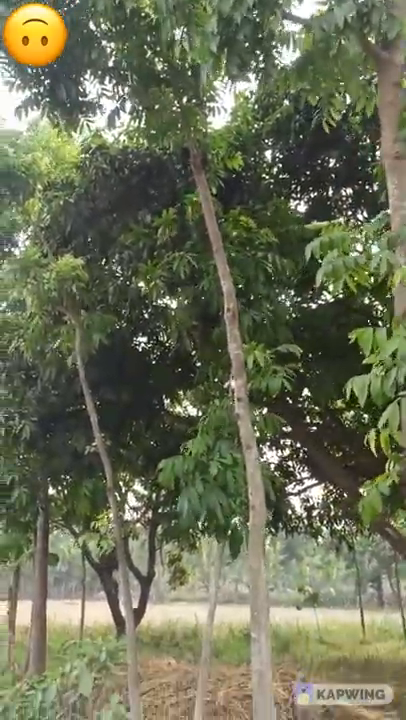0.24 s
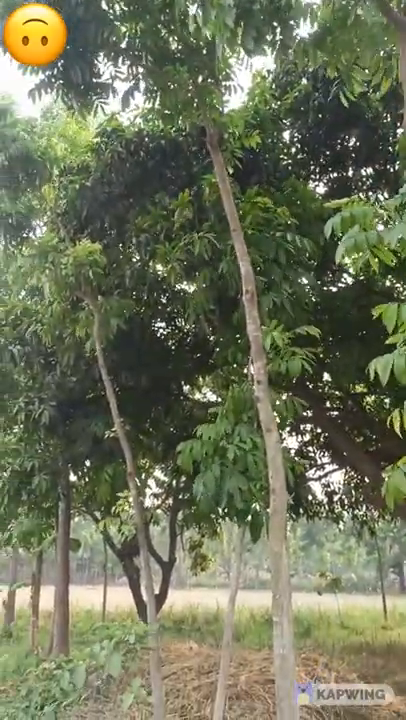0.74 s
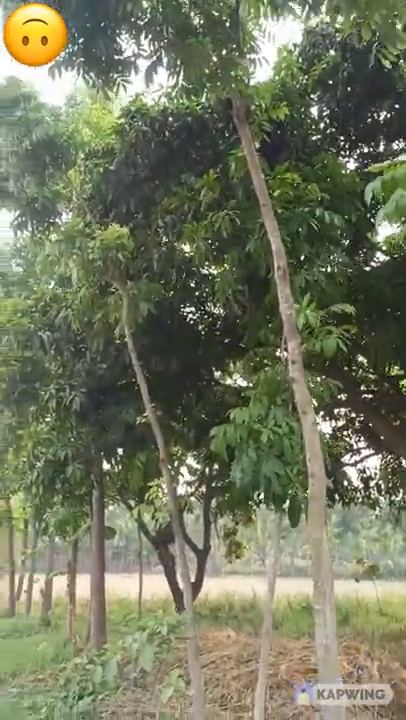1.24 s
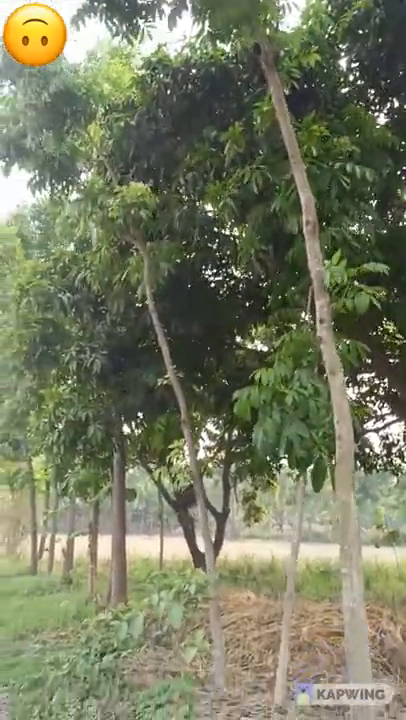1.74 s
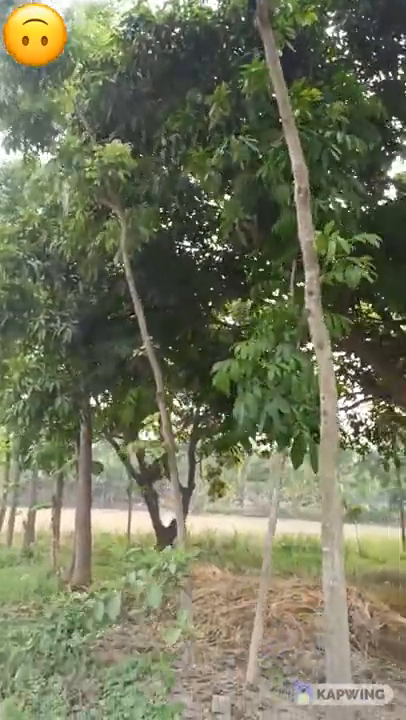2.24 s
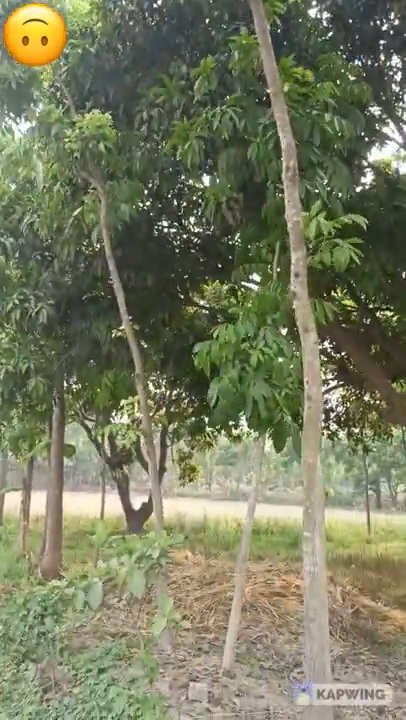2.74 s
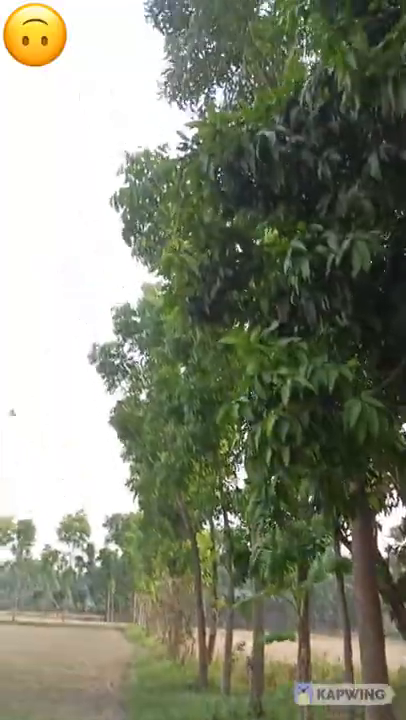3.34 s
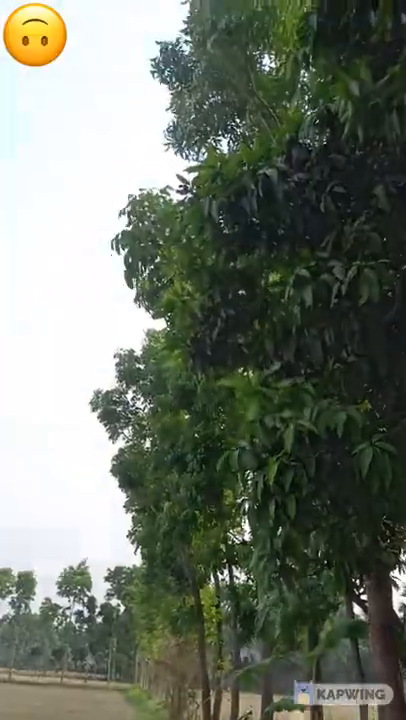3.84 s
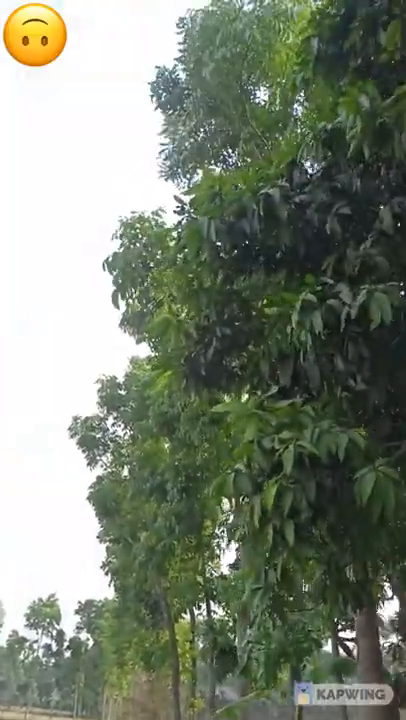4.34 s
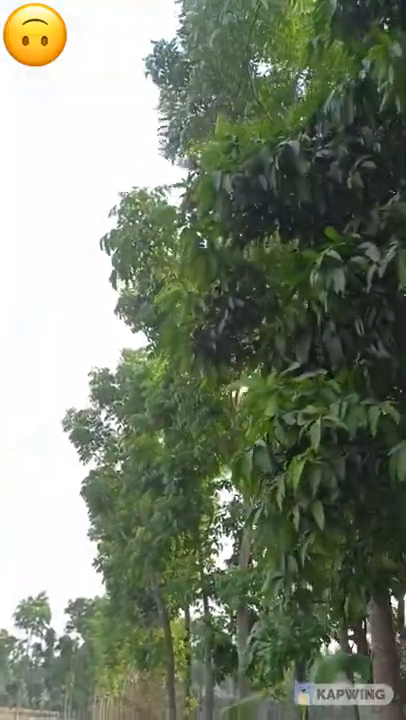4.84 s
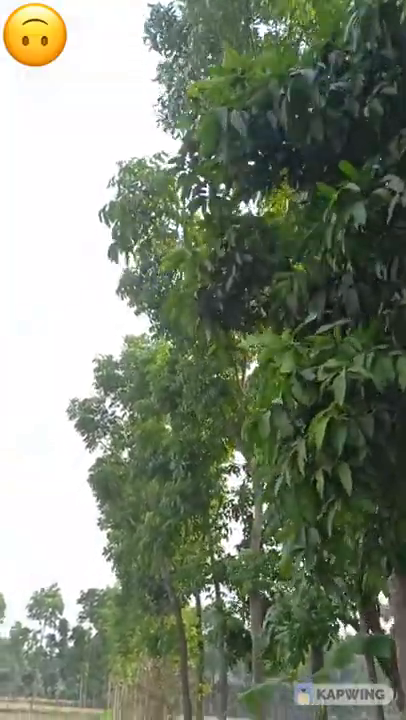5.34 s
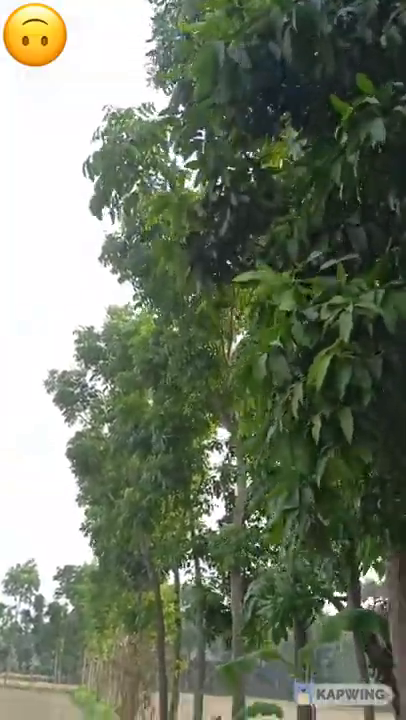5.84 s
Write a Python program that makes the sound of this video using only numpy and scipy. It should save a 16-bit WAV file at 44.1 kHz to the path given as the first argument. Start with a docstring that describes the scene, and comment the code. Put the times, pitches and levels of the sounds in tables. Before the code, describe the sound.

Small birds buzz, chirp and whistle among echoing trees while wind thumps a hand-held phone and dry leaves tick and rustle.

```python
"""Small birds buzz and whistle near and far in trees from the start: tones glide, and fast pitch slips buzz.
Dense scatter from the trunks smears every note. Wind, a fluttering bass noise with short thumps, buffets a
hand-held phone, strongest around 3 s; from 2 s on dry leaves tick and rustle in filtered noise. At 3.03 s
there is a pop, and the tree echoes break off. Then come falling twitters, a second dry trill and
long low far whistles; ticks and rustles gather at the end. Foliage hisses throughout."""
import sys
import numpy as np
from scipy import signal
from scipy.fft import rfft, irfft
from scipy.io import wavfile
from scipy.ndimage import uniform_filter1d

SR = 44100
rng = np.random.default_rng(int(sys.argv[2]) if len(sys.argv) > 2 else 0)


def unload_audio(sound):
    """Save the sound as a 16-bit wav file, at the path given as the first command line argument."""
    columns = np.transpose(np.atleast_2d(sound))
    # keep every value between -1 and 1, then stretch to whole-number steps
    steps = np.round(np.clip(columns, -1, 1) * 32767)
    wavfile.write(sys.argv[1], SR, steps.astype(np.int16))


N = 268128
T = np.arange(N) / SR
JUMP_S = 3.0345  # the pop, where the tree echoes break off
TOP_HZ = 16000  # upper limit of the phone
ARCH = 1.7  # curve of a bird's glide: 1 is even, above 1 lingers at the turning pitch


def undb(db):
    """Decibels to amplitude."""
    return 10 ** (np.asarray(db) / 20)


def unit(x):
    """Scale to an rms of 1."""
    return x / np.sqrt(np.mean(x ** 2))


def band(x, lo_hz, hi_hz):
    """Keep the band between two frequencies, with gentle slopes."""
    return signal.sosfilt(signal.butter(2, [lo_hz, hi_hz], "band", fs=SR, output="sos"), x)


def coloured(shape):
    """Noise of rms 1 whose spectrum follows a table of frequency and level."""
    hz, db = np.transpose(shape)
    log_hz = np.log(np.arange(N // 2 + 1) * SR / N + 1)
    gain = undb(np.interp(log_hz, np.log(hz), db, left=-80, right=-80))
    return unit(irfft(rfft(rng.standard_normal(N)) * gain, N))


def walk(rate_hz):
    """Random levels held for 1 / rate_hz and slewed twice; spread 1."""
    hold = int(SR / rate_hz)
    steps = np.repeat(rng.standard_normal(N // hold + 1), hold)
    return unit(uniform_filter1d(uniform_filter1d(steps, hold), hold)[:N])


def add(out, start_s, x):
    """Mix x into out from start_s on."""
    i = int(start_s * SR)
    x = x[max(-i, 0):N - i]
    out[max(i, 0):max(i, 0) + len(x)] += x


def note_time(rise, fall):
    """Seconds before and after a note's turning point."""
    return np.arange(-rise, fall, 1 / SR)


def note(rise, fall, hz0, hz1, hz2, db, octave_db, arch, bend_hz=0., throb=1.0, rasp=0., scoop_db=0., dip=0.97):
    """A tone glides from hz0 over hz1 to hz2 under a swell, with up to three overtones below the top limit."""
    overtone_step_db, overtone_scoop_share, swell_power = -7, .3, 0.5
    t = note_time(rise, fall)
    climb = (hz0 - hz1) * (-t / rise).clip(0) ** arch
    departure = (hz2 - hz1) * (t / fall).clip(0) ** arch
    hz = hz1 + np.where(t < 0, climb, departure)
    phase = 2 * np.pi * np.cumsum(hz + bend_hz) / SR
    # softer while the glide is below the turning pitch; overtones lose less
    scoop = undb(scoop_db * np.log2(hz / hz1).clip(max=0))
    tone = scoop * (dip * np.sin(phase) + rasp)
    for k in (2, 3, 4):
        if k * hz1 < TOP_HZ:
            level = undb(octave_db + (k - 2) * overtone_step_db) * dip ** (k - 2)
            tone += level * np.sin(k * phase) * scoop ** overtone_scoop_share
    swell = np.cos(np.pi / 2 * np.where(t < 0, t / rise, t / fall)).clip(0) ** swell_power
    return np.sqrt(2) * undb(db) * swell * throb * tone


def buzzes():
    """About two hundred times a second the pitch slips off its perch and the lowest tone dips; rasp is added."""
    # buzzy calls that glide to a turning pitch, then sag a little:
    # (start_s, length_s, start_pitch_hz, turning_pitch_hz, level_db, slip_hz (rms, minus = downward),
    #  octave_db (against the lowest tone))
    arched_calls = [(0.0, 0.063, 3740, 3756, -35.5, 284, -9.5), (0.27, 0.18, 2580, 3660, -37, -260, -14),
                    (0.555, 0.2, 2500, 3585, -36, -300, -9), (0.75, 0.099, 3260, 3737, -32.5, -240, -12.5),
                    (0.905, 0.2, 2630, 3570, -40, -320, -7.5), (1.215, 0.18, 4240, 4110, -51, 200, -21),
                    (1.46, .07, 4000, 4950, -39, 478, -22), (1.47, 0.2, 2497, 4043, -31, -520, -12.5),
                    (1.94, 0.174, 3070, 3114, -45, 160, -14), (1.91, 0.3, 4120, 4180, -40, 278, -14),
                    (2.33, 0.23, 3920, 3970, -44, 446, -13), (2.72, 0.2, 4190, 4320, -37.5, 385.5, -13),
                    (2.997, 0.029, 7450, 7130, -38.5, 240, -19),
                    (3.165, 0.085, 4100, 4090, -48.5, 433, -16), (3.59, 0.33, 3880, 3720, -50, 204.5, -28),
                    (3.845, 0.16, 3045, 3544, -34, -190, -8.5), (3.879, 0.36, 4490, 4430, -43, 447, -14),
                    (4.29, .18, 3374, 3760, -41, 349, -7), (4.44, 0.12, 2853, 2955, -44, 169, -26),
                    (4.556, 0.046, 7240, 7090, -40.5, 197, -27), (4.81, 0.24, 5400, 4470, -43.5, 381, -28),
                    (5.13, .22, 3770, 3836, -31.5, 359, -13)]
    # buzzy slurs that rise evenly to their end:
    # (start_s, length_s, start_pitch_hz, end_pitch_hz, level_db, slip_hz (rms))
    slurs = [(1.23, 0.21, 1887, 2497, -46, 132), (1.689, 0.17, 1980, 2745, -44, 177),
             (2.355, .22, 3152, 3474, -42, 121), (2.527, 0.26, 2400, 2900, -48.5, 108.6),
             (2.665, 0.15, 4070, 4930, -45.5, 198), (3.587, .17, 1910, 2510, -48, 124),
             (3.831, .2, 2656, 2900, -40, 131), (3.985, 0.16, 2950, 3396, -34.5, 187.4),
             (4.189, 0.25, 4020, 4640, -36, 218), (4.249, 0.23, 1956, 3174, -31, 197.6)]
    sag_share, rise_share, scoop_db_per_octave = 0.0185, .7, 32
    slur_rise_share, slur_octave_db, slur_scoop_db_per_octave = 0.77, -17, 26
    slip_rate_hz, rate_jitter = 214.6, .18
    down_dip_db, up_dip_db = -12., -7.
    rasp_db = -12  # against the octave

    cycle = 2 * np.pi * np.cumsum(slip_rate_hz * (1 + rate_jitter * walk(70.))) / SR
    slip = ((1 - np.cos(cycle)) / 2) ** 2 * undb(2.5 * walk(200.))
    dips = [unit(undb(db * slip)) for db in (down_dip_db, up_dip_db)]
    flutter = .3 * walk(300.)
    # centred by loudness, so slips leave the mean pitch in place
    bends = [(slip - np.mean(slip * dip ** 2)) / slip.std() + flutter for dip in dips]
    ragged = undb(2.2 * walk(150.) + 1.8 * walk(35.))
    rasp = unit(band(rng.standard_normal(N), 3400.0, 20000.0))

    calls = []
    for s, length, hz0, hz1, db, slip_hz, octave_db in arched_calls:
        calls.append((s, length, hz0, hz1, (1 - sag_share) * hz1, db, slip_hz, octave_db,
                      rise_share, ARCH, scoop_db_per_octave))
    for s, length, hz0, hz2, db, slip_hz in slurs:
        hz1 = hz0 + slur_rise_share * (hz2 - hz0)
        calls.append((s, length, hz0, hz1, hz2, db, slip_hz, slur_octave_db,
                      slur_rise_share, 1, slur_scoop_db_per_octave))

    out = np.zeros(N)
    for call, turn in zip(calls, rng.random(200)):
        s, length, hz0, hz1, hz2, db, slip_hz, octave_db, share, arch, scoop_db = call
        rise, fall = share * length, (1 - share) * length
        # each call reads the shared slips and rasp from a random place
        at = (np.arange(len(note_time(rise, fall))) + int(turn * N)) % N
        upward = int(slip_hz > 0)
        add(out, s, note(rise, fall, hz0, hz1, hz2, db, octave_db, arch,
                         bend_hz=slip_hz * bends[upward][at], throb=ragged[at],
                         rasp=undb(octave_db + rasp_db) * rasp[at],
                         scoop_db=scoop_db, dip=dips[upward][at]))
    return out


def glides(waver, waver_db):
    """Clear whistles glide straight and waver in pitch, far ones also in level; rows: near, far."""
    # (start_s, length_s, start_pitch_hz, end_pitch_hz, level_db)
    clear_notes = [(-0.005, 0.02, 3316, 4350, -26.5), (0.031, 0.016, 4300, 3240, -25.5),
                   (0.047, .014, 3410, 4640, -26), (0.409, 0.041, 4300, 4500, -47),
                   (1.619, 0.065, 4170, 2440, -39), (1.788, 0.058, 5370, 5273, -44),
                   (1.834, 0.02, 4117, 4280, -20), (1.857, 0.017, 3970, 4160, -21),
                   (1.874, 0.028, 3960, 3620, -26.5), (2.111, 0.037, 2110, 2220, -42.5),
                   (2.191, 0.044, 2400, 2540, -43.5), (2.213, 0.075, 3490, 3270, -38.5),
                   (2.316, 0.041, 4680, 4540, -38.5), (2.368, .06, 3170, 3260, -40.5),
                   (2.4, .055, 2205, 2260, -48.5), (2.753, 0.082, 3000, 3145, -43.5),
                   (2.843, 0.085, 4102, 3972, -29.5), (2.918, 0.077, 2500, 2456, -41.5),
                   (3.018, 0.0175, 5390, 5180, -34), (4.061, .014, 3396, 3230, -29),
                   (4.642, 0.064, 4410, 3970, -38), (4.77, 0.11, 2706, 2820, -43),
                   (4.96, 0.087, 3400, 3440, -48), (5.086, 0.045, 1756, 1845, -44),
                   (5.456, 0.21, 1646, 1665, -46), (5.732, 0.28, 1616, 1610, -48)]
    far_db = -38  # fainter whistles are far off
    out = np.zeros((2, N))
    for s, length, hz0, hz2, db in clear_notes:
        far = int(db < far_db)
        share = 0.56 if far else 0.54
        rise, fall = share * length, (1 - share) * length
        at = (np.arange(len(note_time(rise, fall))) + int(s * SR)) % N
        add(out[far], s, note(rise, fall, hz0, hz0 + share * (hz2 - hz0), hz2, db, octave_db=-23.0, arch=0.88,
                              bend_hz=(1 + 1.3 * far) * hz0 * waver[at], throb=undb(far * waver_db[at])))
    return out


def twitter():
    """Short chips fall steeply in pitch, singly or in loose runs."""
    # single chips: (start_s, peak_db, pitch_hz)
    chips = list([(1.836, -36, 4670), (1.858, -40, 4730), (1.879, -37, 4600), (3.4605, -39, 3400),
                  (3.481, -38.5, 3930), (3.5027, -36.5, 3450), (3.6244, -43, 3960), (3.664, -43, 3720),
                  (3.71, -43, 3310), (3.7838, -38, 3370), (3.8117, -35.5, 3790)])
    # runs of many birds: (start_s, end_s, loudest_peak_db, lowest_pitch_hz, highest_pitch_hz)
    runs = [(3.446, 3.56, -43, 2160, 4620), (3.559, 3.85, -47, 2970, 4330),
            (4.676, 4.88, -44.5, 3640, 4360)]
    gap_s = .016  # mean spacing in a run
    for s0, s1, db, lo_hz, hi_hz in runs:
        for s, (late, soft, high) in zip(np.arange(s0, s1, gap_s), rng.random((60, 3))):
            chips.append((s + late * gap_s, db - 3.2 * soft, lo_hz + high * (hi_hz - lo_hz)))
    out = np.zeros(N)
    for s, db, hz in chips:
        rms_db = db - 10 * np.log10(2)
        add(out, s, note(0.00368, 0.0078, 1.32 * hz, hz, 0.9 * hz, rms_db, octave_db=-30.0, arch=ARCH))
    return out


def trills():
    """Dry trills repeat an even, slightly falling pip."""
    # (start_s, end_s, gap_s, pitch_hz, level_db)
    pip_runs = [(0.714, .755, 0.011, 4490, -36.5), (4.558, 4.613, .0145, 4960, -42.5)]
    out = np.zeros(N)
    for s0, s1, gap, hz, db in pip_runs:
        for s in np.arange(s0, s1, gap):
            add(out, s, note(0.0021, 0.0029, 1.03 * hz, hz, 0.97 * hz, db, octave_db=-30., arch=1))
    return out


def low_whistles(waver, waver_db):
    """Long low whistles far off: pure tones that follow a drawn pitch and level, wavering in both."""
    # one table for each whistle: (time_s, pitch_hz, level_db)
    curves = [
        [(3.58, 1223, -60), (3.70, 1250, -62), (3.98, 1206, -59), (4.17, 1446, -48), (4.278, 1150, -56),
         (4.32, 1150, -56)],
        [(5.62, 1260, -53), (5.7, 1283, -49), (5.82, 1440, -50.5), (5.99, 1170, -58)],
    ]
    out = np.zeros(N)
    for s, hz, db in map(np.transpose, curves):
        phase = 2 * np.pi * np.cumsum(np.interp(T, s, hz) * (1 + waver)) / SR
        level_db = np.interp(T, s, db, left=-200, right=-200) + waver_db
        out += np.sqrt(2) * undb(level_db) * np.sin(phase)
    return out


def whistles():
    """All clean-toned calls; glides and low whistles share one waver, chips and trills have none; near, far."""
    waver, waver_db = 0.00706 * walk(60.), 2.86 * walk(45.)  # share of the pitch, and level
    near, far = glides(waver, waver_db)
    near += twitter() + trills()
    far += low_whistles(waver, waver_db)
    return near, far


def trees(x, direct_db, scatter_db):
    """Direct sound plus dense decaying scatter from trunks; no echo crosses the pop."""
    t60_s = 0.28
    t = T[:SR // 2]
    scatter = rng.standard_normal(len(t)) * 1000. ** (-t / t60_s) * (t > .004)
    scatter *= undb(scatter_db) / np.sqrt(np.sum(scatter ** 2))
    scatter[0] = undb(direct_db)
    return sum(signal.fftconvolve(x * part, scatter)[:N] * part for part in (T < JUMP_S, T >= JUMP_S))


def wind():
    """Turbulence on the microphone: fluttering bass noise, and gust thumps of one or two cycles."""
    # loudness of the wind before its flutter: (time_s, level_db)
    gusts = [(0.0, -43), (0.25, -51), (0.54, -29.5), (0.57, -41.5), (1.1, -41.5), (1.62, -36.5),
             (1.87, -30), (1.96, -25), (2.4, -38), (2.49, -24.5), (2.62, -37.5), (2.74, -11.5),
             (2.96, -62.5), (3.06, -14), (3.18, -41), (3.54, -25.5), (3.64, -38.5), (3.88, -24), (4.0, -35),
             (4.94, -41.5), (5.21, -26), (5.4, -36.5), (6.08, -26.5)]
    # relative spectrum of the turbulence: (frequency_hz, density_db (per Hz))
    turbulence = [(12, -54), (20, -34), (67, 2.5), (135, 1), (172, -2.5), (222, -6.5), (419, -26),
                  (900, -59), (1170, -59)]
    # single gust thumps: (start_s, peak_db, pitch_hz)
    thumps = [(0.519, -15.5, 108), (1.601, -17, 123), (1.794, -4, 155), (1.939, -13, 121), (1.968, -8, 137),
              (2.48, -4.5, 126), (2.535, -11, 97), (2.728, -5, 176.7), (3.052, -8, 138), (4.175, -18, 198),
              (5.149, -11.5, 139), (5.199, -14.5, 145), (5.765, -17.5, 99), (5.899, -13, 172)]
    noise = coloured(turbulence)
    flutter_db = 3.2 * walk(35.).clip(max=1.6)
    out = noise * undb(np.interp(T, *np.transpose(gusts)) + flutter_db)
    for s, db, hz in thumps:
        cycles = np.arange(0, 3 * SR / hz) * hz / SR
        add(out, s, undb(db) * np.exp(-((cycles - 1.3) / 0.71) ** 2) * np.sin(2 * np.pi * cycles))
    return out


def pop():
    """One low click: a 112 Hz cosine that dies within milliseconds."""
    out, t = np.zeros(N), T[:SR // 20]
    add(out, JUMP_S, undb(-9) * np.exp(-t / 0.0038) * np.cos(2 * np.pi * 112 * t))
    return out


def ticks():
    """Dry leaves and twigs crack for milliseconds: a crisp middle, a hollow knock and a thin top."""
    # (start_s, crack_peak_db, knock_db (peak, against the crack), top_db (rms of 5 ms, against the crack))
    cracks = [(2.096, -15.5, -12, -19), (2.125, -23.5, -4, -19), (2.142, -21, -14, -6),
              (2.1727, -6.5, -12.5, -14), (2.223, -21.5, -13, -13.5), (2.368, -13.5, -12.5, -17),
              (3.131, -37, -3, -6), (3.32, -25, -0.5, -16), (3.3253, -27.5, -6, -16),
              (3.496, -28, 3.5, -15), (4.578, -33, 7.5, -21), (5.252, -29.5, 5.5, -8),
              (5.8777, -25.5, -21, -15), (5.941, -24, -20, -18), (5.9748, -25, -14, -14),
              (6.0426, -13.5, -24, -17.5), (6.0744, -16.5, -20, -18)]
    out, t = np.zeros(N), T[:600]
    for (s, db, knock_db, top_db), noise in zip(cracks, rng.standard_normal((len(cracks), 600))):
        burst = noise * np.exp(-t / 0.0019)
        for lo_hz, hi_hz, peak_db in ((2460.0, 8450.0, db), (935.0, 2250.0, db + knock_db)):
            part = band(burst, lo_hz, hi_hz)
            add(out, s, undb(peak_db) * part / np.abs(part).max())
        top = band(burst, 9200.0, 20000.0)
        add(out, s, undb(db + top_db) * top / top[:SR // 200].std())
    return out


def rustles():
    """Dry leaves rustle: grainy noise in a band, swelling and fading."""
    # (peak_s, rise_s, fall_s, level_db, middle_hz)
    swells = [(2.11, 0.06, 0.085, -42.5, 1980), (2.13, 0.069, 0.087, -41, 6800),
              (3.13, 0.012, .02, -48, 6600), (5.56, 0.073, 0.11, -38.5, 2350),
              (5.97, 0.083, 0.023, -46.5, 5970), (6.04, 0.02, 0.052, -40, 6000)]
    grains = rng.standard_normal(N) * undb(0.82 * walk(400.))
    out = np.zeros(N)
    for s, rise, fall, db, hz in swells:
        swell = np.exp(-np.where(T < s, (T - s) / rise, (T - s) / fall) ** 2)
        out += undb(db) * swell * unit(band(grains, hz / 2.35, min(hz * 1.57, TOP_HZ)))
    return out


def leaves():
    """Flickering hiss of foliage and far birds over a lower murmur, both shaped noise."""
    # loudness before the flicker: (time_s, hiss_db (8.5 to 15 kHz), murmur_db)
    levels = [(0.0, -49, -51.5), (0.25, -65, -54.5), (0.8, -57.5, -51.5), (3.3, -59, -48),
              (5.47, -56.5, -48), (5.74, -57, -44), (6.08, -58.5, -47.5)]
    # relative spectrum of the hiss: (frequency_hz, density_db (per Hz))
    hiss_shape = [(1180, -36), (2000, -6), (2400, -16), (2710, -5), (3840, -1.5), (6530, -10.5),
                  (7770, -5.5), (9830, -20), (12300, -18), (15200, -15.5), (16000, -7.5)]
    # relative spectrum of the murmur: (frequency_hz, density_db (per Hz))
    murmur_shape = [(300, 0), (500, 1), (1000, -6), (1600, -7.5), (2600, -13.5), (4000, -43)]
    s, hiss_db, murmur_db = np.transpose(levels)
    flicker_db = .8 * walk(8.)
    hiss = coloured(hiss_shape)
    hiss *= undb(np.interp(T, s, hiss_db) + flicker_db) / band(hiss, 8500, 15000).std()
    murmur = coloured(murmur_shape) * undb(np.interp(T, s, murmur_db) + 1.46 * walk(20.))
    return hiss + murmur


def scene():
    """Birds among the trees, far ones mostly as scatter, with wind, pop, ticks and leaves."""
    near, far = whistles()
    birds = trees(buzzes(), direct_db=-0.5, scatter_db=-1.5)
    birds += trees(near, direct_db=1.0, scatter_db=-4.5)
    birds += trees(far, direct_db=-3.5, scatter_db=-1.5)
    return (birds + wind() + pop() + ticks() + rustles() + leaves())[None]


def record(dry):
    """The phone drops the deep bass, rounds the loudest peaks and cuts the top."""
    out = signal.sosfilt(signal.butter(2, 42., "high", fs=SR, output="sos"), dry)
    rounded = np.tanh(1.227 * out) / 1.166
    return signal.sosfilt(signal.ellip(10, .2, 70, TOP_HZ, fs=SR, output="sos"), rounded)


dry = scene()
out = record(dry)
unload_audio(out)
```